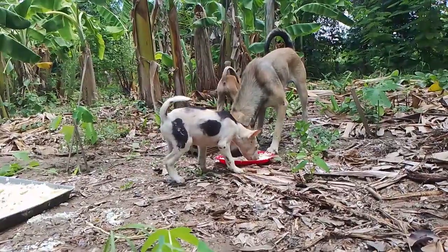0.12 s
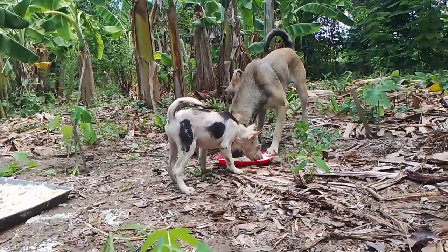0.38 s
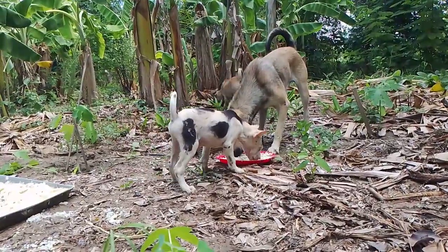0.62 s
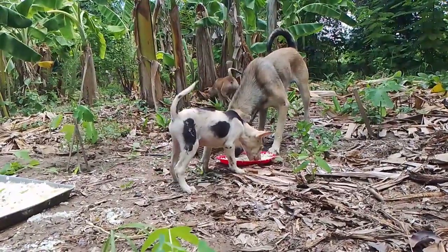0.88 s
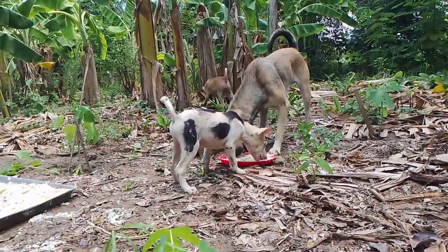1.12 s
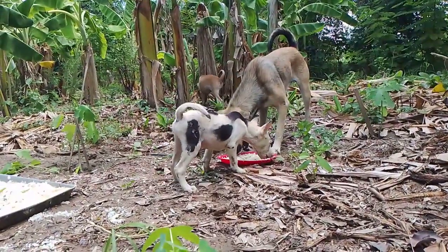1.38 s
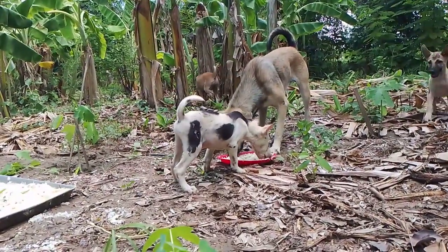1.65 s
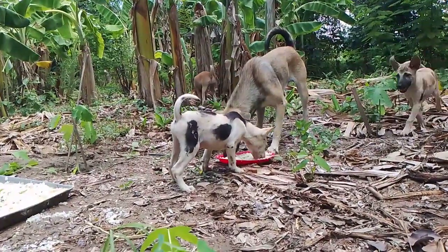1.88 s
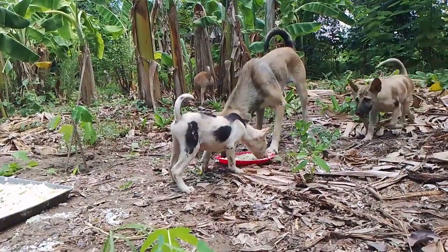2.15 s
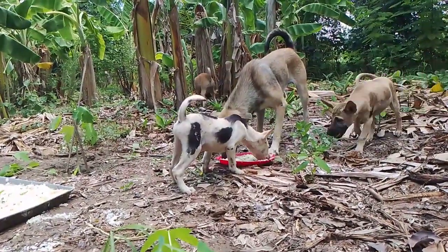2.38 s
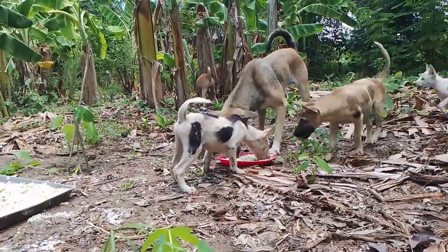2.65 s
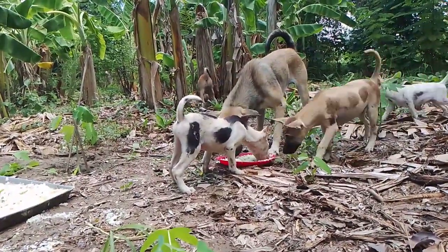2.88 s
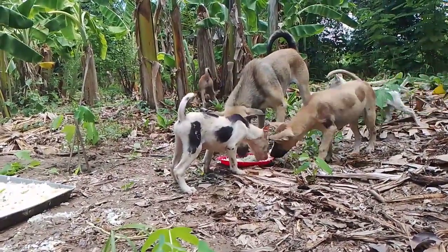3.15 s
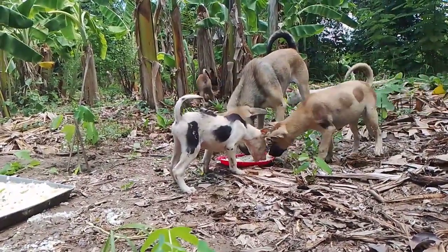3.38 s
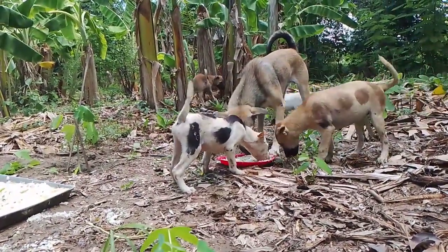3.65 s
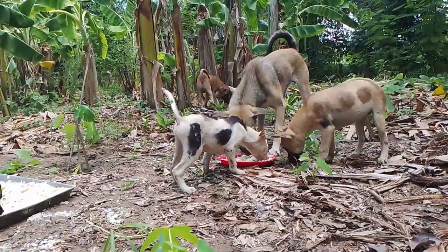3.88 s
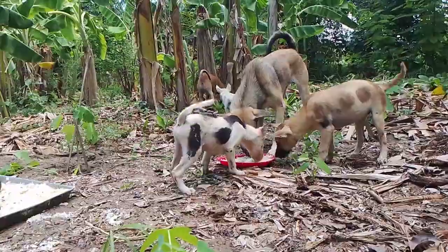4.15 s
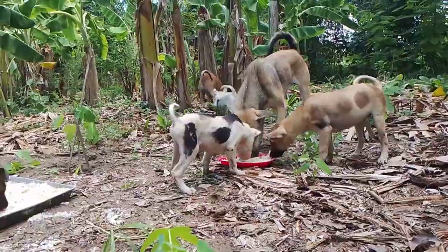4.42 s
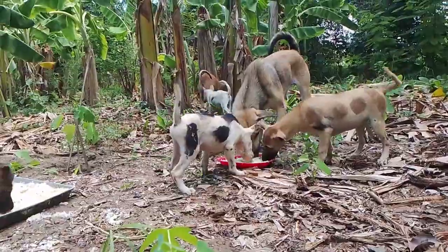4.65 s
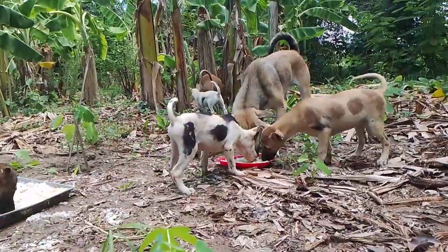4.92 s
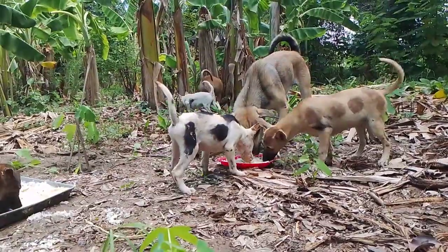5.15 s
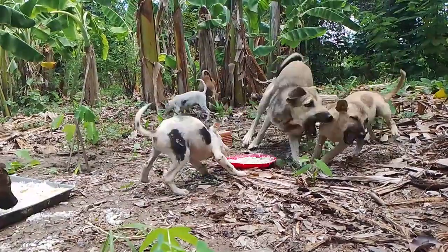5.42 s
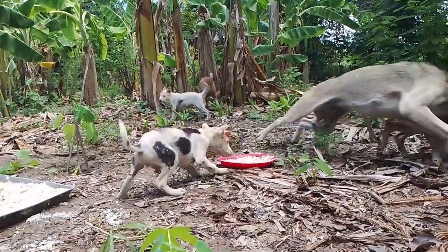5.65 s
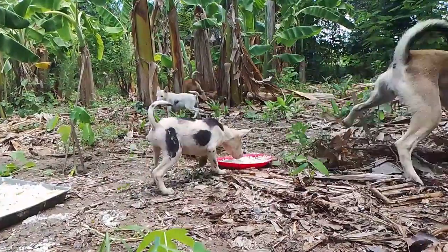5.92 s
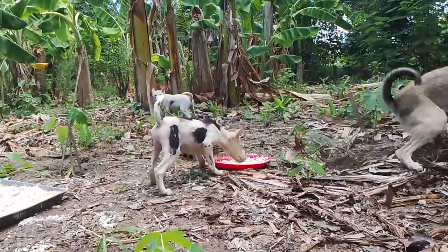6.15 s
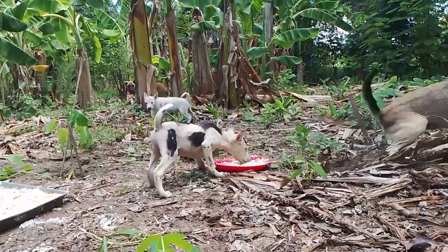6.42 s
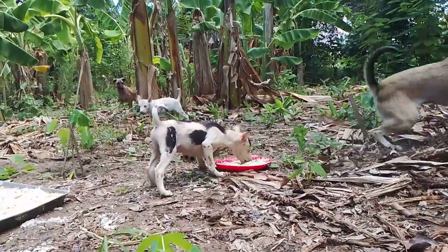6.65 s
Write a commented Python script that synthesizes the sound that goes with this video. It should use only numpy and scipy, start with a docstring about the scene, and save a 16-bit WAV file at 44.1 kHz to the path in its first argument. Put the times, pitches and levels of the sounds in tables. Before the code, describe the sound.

In a leafy grove, soft paw rustles, small twig snaps and light plastic plate ticks sit over faint steady air. A quiet low growl comes midway, then near silence. Abruptly a big dog snaps and snarls with a thud and thrashing leaves, and a puppy screams three times, hoarse, piercing and squeaky. One fixed microphone a few metres away; trunks return a slight echo.

```python
"""Paws rustle in dry leaves in a grove, twigs snap and a plastic plate ticks as dogs feed; a big dog growls low.
Then it snaps and snarls, and a pup screams three times, hoarse with a few clear squeaks; the trunks throw it back.
Voices are vocal pulses and leaking air sent through the resonances of a throat; leaves are shaped noise and
short cracks; the plate is a set of fading tones. Low thuds, faint whistles and steady air fill in the rest."""
import sys
import numpy as np
from scipy import signal
from scipy.io import wavfile
from scipy.ndimage import uniform_filter1d, minimum_filter1d

SR = 44100
rng = np.random.default_rng(int(sys.argv[2]) if len(sys.argv) > 2 else 0)


def voltage_ratio(decibels):
    """Convert decibels (scalar or array-like) to amplitude ratios, 20 dB per decade."""
    exponent = np.asarray(decibels, float) / 20
    return 10 ** exponent


def to_wav(s):
    """Save 16-bit WAV."""
    ch = np.atleast_2d(s).T  # columns
    pcm = np.round(np.clip(ch, -1, 1) * 32767)  # PCM
    wavfile.write(sys.argv[1], SR, pcm.astype(np.int16))


N = 299439

# ringing modes of the plate: [pitch_hz, level_db, t60_s (time to fade 60 dB)]
PLATE_MODES = [(398, 0.5, 0.1), (730, 6.5, 0.052), (1430, 5.5, 0.07), (2440, -5, 0.12), (2730, -4, 0.047),
               (3920, 0, 0.087)]


def evened(x):
    """Scales to an average power of 1."""
    return x / np.sqrt(np.mean(x ** 2) + 1e-20)


def drift(shape, size):
    """Slow random wandering: noise smoothed over this many samples."""
    return evened(uniform_filter1d(rng.standard_normal(shape), size))


def columns(rows, t):
    """Reads every column of a table at the times t."""
    s, *values = np.transpose(rows)
    return [np.interp(t, s, v) for v in values]


def span(rows):
    """Sample times from the first to the last row."""
    first, last = round(rows[0][0] * SR), round(rows[-1][0] * SR)
    return np.arange(first, min(last, N)) / SR


def add(mix, s, sound):
    """Mixes a sound in at time s."""
    part = mix[round(s * SR):][:len(sound)]
    part += sound[:len(part)]


def resonate(x, hz, width_hz):
    """A steep moving resonance: shift down, smooth twice, shift back."""
    turn = np.exp(2j * np.pi * np.cumsum(hz * np.ones(len(x))) / SR)
    r = np.exp(-np.pi * width_hz / SR)
    smooth = signal.lfilter([(1 - r) ** 2], [1, -2 * r, r ** 2], x / turn + 1e-18)
    return 2 * (turn * smooth).real


def steady(x, size=900):
    """Evens out the slow level so that another curve can set it."""
    return x / np.sqrt(uniform_filter1d(x ** 2, size) + 1e-12)


def folds(hz, rough, jitter, top_hz):
    """Vocal pulses: rough folds wander in rate, vary in strength each cycle and leak puffs of air."""
    air, strength = rng.standard_normal((2, len(hz)))
    turns = np.cumsum(hz * (1 + jitter * rough * drift(len(hz), 600))) / SR
    # the k-squared phase smears each pulse over part of its cycle
    pulses = sum(np.cos(2 * np.pi * k * turns + .11 * k * k) * (k * hz < top_hz)
                 for k in range(1, int(top_hz / hz.min())))
    pulses = steady(pulses) * voltage_ratio(4 * rough * uniform_filter1d(strength[turns.astype(int)], 30))
    # air leaks most at the start of each cycle
    puffs = evened((.5 + np.exp(-(turns % 1) / 0.33)) * air) * np.sqrt(SR / 2 / top_hz)
    return np.sqrt(1 - rough ** 2) * pulses + .62 * rough ** 2.4 * puffs


def noise(spectrum, shape_db, patchy_db, size):
    """Random short-time spectra; shape_db(hz, t) moves them, patches drift over them."""
    hz = np.fft.rfftfreq(size, 1 / SR)[:, None]
    t = np.arange(4 * N // size + 5) * size / 4 / SR
    a, b, patches = rng.standard_normal((len(t), len(hz), 3)).T
    patches = evened(uniform_filter1d(uniform_filter1d(patches, 6, 0), 14, 1))
    f, level_db = np.transpose(spectrum)
    colour_db = np.interp(np.log(hz + 1), np.log(f + 1), level_db)
    z = (a + 1j * b) * voltage_ratio(colour_db + patchy_db * patches)
    # the loudness is evened before shape_db acts, so shape_db sets the level
    scale = np.std(signal.istft(z, nperseg=size, noverlap=3 * size // 4)[1])
    shaped = signal.istft(z * voltage_ratio(shape_db(hz, t)), nperseg=size, noverlap=3 * size // 4)[1]
    return shaped[:N] / scale


def air():
    """The steady background: noise with a fixed colour and slow drifting patches."""
    # colour of the air: [pitch_hz, relative_level_db]
    air_colour = [(26, -41), (45, 1), (92, -7.5), (135, -6), (165, -9), (205, -3), (290, 1), (474, -5),
                  (989, -5.5), (2120, -0.5), (3630, -8.5), (7760, -24), (8990, -18.5), (13000, -87),
                  (15800, -32)]
    return voltage_ratio(-56) * noise(air_colour, lambda hz, t: 0 * t, patchy_db=2.0, size=2048)


def thuds():
    """Bodies push on the ground: short low tones that die fast."""
    # [start_s, level_db]
    pushes = [(5.367, -26), (5.947, -39), (6.55, -44)]
    out, t = np.zeros(N), np.arange(9000) / SR
    for s, level_db in pushes:
        tone = np.sin(2 * np.pi * 55 * t) * np.minimum(t / 0.0024, 1)
        add(out, s - .004, voltage_ratio(level_db - 60 * t / 0.042) * tone)
    return out


def whistles():
    """Faint pure tones whose level wavers and sinks by 7 dB."""
    # [start_s, end_s, pitch_hz, level_db]
    tones = [(4.162, 4.2, 2730, -46), (4.17, 4.457, 2240, -53.5), (4.45, 4.955, 480, -62),
             (5.07, 5.128, 2840, -54.5)]
    out = np.zeros(N)
    for s, end, hz, level_db in tones:
        t = np.arange(0, end - s, 1 / SR)
        waver_db = 2.6 * drift(len(t), 900)
        tone = np.sin(2 * np.pi * hz * t) * signal.windows.tukey(len(t), .15)
        add(out, s, voltage_ratio(level_db - 7 * t / (end - s) + waver_db) * tone)
    return out


def paws(t):
    """Level and crispness of the rustle: every step swells and fades, their powers add."""
    # paws in the leaves: [loudest_s, level_db, fade_s (time to fade 10 dB), treble_db]
    steps = [(.02, -53, 0.93, -3), (.55, -51.5, 0.6, -4), (.853, -46.5, 0.26, -6.5),
             (.935, -52.5, 0.48, 15), (1.105, -37.5, -0.6, -7), (1.207, -44.5, 0.33, -3.5),
             (1.282, -45.5, 0.11, 12), (1.335, -47, 0.1, 0), (1.416, -43.5, 0.03, -2.5),
             (1.537, -43.5, 0.22, 2), (1.711, -52.5, 0.3, -3), (1.884, -46, 0.24, -2.5),
             (1.967, -35.5, 0.03, 3.5), (2.05, -48.5, 0.08, 3), (2.256, -48, 0.36, 0.5),
             (2.577, -44.5, 0.16, 4.5), (2.679, -43.5, 0.01, -1), (2.774, -49, 0.28, 4.5),
             (3.114, -51.5, 0.25, 0.5), (3.267, -45, 0, -3), (3.492, -51, 0.36, -1.5),
             (3.582, -52.5, 0.05, -16), (3.8, -53, 0.33, -1.5), (4.268, -58, 0.23, 10.5),
             (5.04, -61, 4.2, -30), (5.389, -22, 0.066, -13.5), (5.5, -26.5, 0.31, -3),
             (5.68, -25, 0.1, -2), (5.87, -28, 0.1556, -2), (5.959, -34, 0.18, -11), (6.05, -31, 0.21, 0),
             (6.378, -31.5, 0.23, 0), (6.78, -35.5, 0.5, -3)]
    rise_share, bed_db = 0.28, -68  # the swell as a share of the fading time; a faint bed of rustle
    s, level_db, fade_s, treble_db = np.transpose(steps)[:, :, None]
    late = (t - s) / np.maximum(fade_s, .004)
    power = voltage_ratio(2 * (level_db - 10 * np.maximum(late, -late / rise_share)))
    total = power.sum(0) + voltage_ratio(2 * bed_db)
    return 10 * np.log10(total), (power * treble_db).sum(0) / total


def ground():
    """A dull rumble that follows the steps, weakened under all but the heavy ones."""
    heavy_db = -40  # below this the rumble falls twice as fast as the rustle
    t = np.arange(0, N / SR, .01)
    level_db = paws(t)[0]
    level_db = np.interp(np.arange(N) / SR, t, level_db + np.minimum(level_db - heavy_db, 0))
    rumble = resonate(rng.standard_normal(N), hz=222, width_hz=127)
    return voltage_ratio(level_db - 19) * evened(rumble)


def leaves():
    """Rustle swells under each step, with short pitched cracks of single leaves scattered through it."""
    # colour of the rustle: [pitch_hz, relative_level_db]
    leaf_colour = [(170, -41), (330, -1.5), (700, -8), (1000, -10), (1440, -7.5), (2500, -4.5), (4000, -8),
                   (7000, -17.5), (10000, -20.5), (13000, -34), (15800, -27)]

    def shape_db(hz, t):
        """Follows the steps; their treble comes in from 3500 Hz and is full an octave higher."""
        level_db, treble_db = paws(t)
        return level_db + np.clip(np.log2(hz / 3500 + 1e-9), 0, 1) * treble_db

    # about 300 tiny grains a second make the rustle uneven
    crackle = voltage_ratio(2.2 * np.minimum(rng.exponential(1, N), 4)) * (rng.random(N) < 300 / SR)
    grain = signal.oaconvolve(crackle, np.exp(-np.arange(1500) / SR / .003))[:N]
    rustle = noise(leaf_colour, shape_db, patchy_db=2.8, size=256) * evened(2.4 + grain)

    cracks = np.zeros(N)
    f, colour_db = np.transpose(leaf_colour)
    for hz in np.geomspace(350, 11000, 16):
        u = np.arange(0, 5 / hz + .002, 1 / SR)
        # about 14 cracks a second at each pitch
        train = voltage_ratio(4 * np.minimum(rng.exponential(1, N), 3)) * (rng.random(N) < 14 / SR)
        crack = np.sin(2 * np.pi * hz * u) * np.hanning(len(u))
        crack *= voltage_ratio(np.interp(hz, f, colour_db)) * np.sqrt(hz / f[1])
        cracks += signal.oaconvolve(train, crack)[:N]
    t = np.arange(0, N / SR, .005)
    level_db = np.interp(np.arange(N) / SR, t, paws(t)[0])
    return rustle + evened(cracks) * voltage_ratio(level_db - 12)


def snaps():
    """Each snap is a crack and a burst of noise round its centre that also rings the plate; most are leaves or
    twigs, and the one at 5.289 s is the sharp start of the big dog's huff."""
    # [start_s, peak_db, centre_hz, t60_s]
    breaks = [(.64, -41.5, 533, 0.044), (0.778, -37.5, 3940, 0.14), (.846, -36, 1240, 0.045),
              (1.192, -44, 2570, 0.49), (1.272, -30, 2570, 0.21), (1.696, -34, 2460, 0.14),
              (1.954, -34.5, 423, 0.054), (1.964, -25.5, 2320, 0.24), (2.447, -46, 2370, 0.132),
              (2.595, -32, 2730, 0.14), (2.652, -34, 4700, 0.036), (3.112, -35, 690, 0.031),
              (3.351, -38.5, 2880, 0.026), (3.578, -29.5, 5850, 0.0098), (4.143, -35.5, 4070, 0.014),
              (4.165, -40, 1630, 0.29), (4.259, -41, 1630, 0.23), (5.03, -45.5, 5030, 0.12),
              (5.289, -29, 796, 0.053), (5.661, -34, 6900, 0.034), (5.963, -29, 9100, 0.042),
              (6.25, -39, 9100, 0.019), (6.513, -28, 9000, 0.013), (6.577, -32.5, 8800, 0.022)]
    out, t = np.zeros(N), np.arange(9000) / SR
    ring = sum(voltage_ratio(db - 60 * t / t60) * np.sin(2 * np.pi * hz * t) for hz, db, t60 in PLATE_MODES)
    for s, peak_db, hz, t60 in breaks:
        fade = voltage_ratio(-60 * t / t60) + 0.39 * voltage_ratio(-60 * t / 0.0014)
        burst = rng.standard_normal(len(t)) * fade
        body = resonate(burst, hz, 0.92 * hz)
        crack = 0.021 * np.diff(burst, prepend=0)
        plate = 0.0079 * signal.oaconvolve(body, ring)[:len(t)]
        colour = body + crack + plate
        add(out, s - .001, voltage_ratio(peak_db) * colour / abs(colour).max())
    return out


def knocks():
    """Tongues and teeth knock the plate: each knock rings the modes nearest its pitch, briefly."""
    # [start_s, peak_db, pitch_hz (of the modes struck most)]
    hits = [(0.846, -35.5, 1500), (0.968, -39, 1420), (1.101, -41, 366), (1.166, -45.5, 323),
            (1.273, -30, 1430), (1.315, -44, 1460), (1.403, -36, 1410), (1.465, -33.5, 1110),
            (1.62, -46, 624), (2.675, -43, 834), (2.706, -43, 764)]
    out, t = np.zeros(N), np.arange(5000) / SR
    for s, peak_db, near_hz in hits:
        ring = np.zeros(len(t))
        for hz, db, t60 in PLATE_MODES:
            struck_db = db - 8.3 * np.log2(hz / near_hz) ** 2
            ring += voltage_ratio(struck_db - 60 * t / t60) * np.sin(2 * np.pi * hz * t)
        ring *= np.minimum(t / 0.0029, 1)
        add(out, s - .001, voltage_ratio(peak_db) * ring / abs(ring).max())
    return out


def growl():
    """Slow warning growls in the chest: slow vocal beats swell in, waver, rise a little and stop short."""
    # [start_s, length_s, level_db, chest_share (multiplies the chest pitches)]
    warnings = [(3.171, 0.73, -50.5, 1), (3.928, 0.088, -51.5, 1), (4.014, 0.049, -50.5, 1),
                (6.665, 0.218, -44, 0.88)]
    # chest resonances: [pitch_hz, width_hz, level_db]
    chest_modes = [(112, 78, 3.5), (314, 82, 10.5), (695, 130, -1.5)]
    swell_share, stop_s = 0.3, 0.025  # the swell is a share of the length
    high_pass = signal.butter(3, 70, "high", fs=SR, output="sos")
    out = np.zeros(N)
    for start, length, level_db, share in warnings:
        t = np.arange(0, length, 1 / SR)
        drive = folds(49.5 + 0 * t, rough=.47, jitter=.2, top_hz=1000)
        chest = sum(voltage_ratio(db) * resonate(drive, f * share, w) for f, w, db in chest_modes)
        chest = signal.sosfilt(high_pass, chest)  # too small for its own lowest note
        waver_db = 2 * drift(len(t), 800)
        end_rise_db = 2.5 * (t / length) ** 4
        shape = np.minimum(t / (swell_share * length), 1) * np.minimum((length - t) / stop_s, 1)
        add(out, start, voltage_ratio(level_db + waver_db + end_rise_db) * steady(chest, size=4000) * shape)
    return out


def big_dog():
    """The big dog's huff, snap and snarls: each swells, holds and dies while the throat pitch sags."""
    # [start_s, length_s, effort_db, first_throat_hz, loudest_share (0-1 of the length)]
    snarls = [(5.284, 0.051, -35.5, 1160, 0.7), (5.345, 0.082, -7.5, 740, 0.17),
              (5.42, 0.046, -14.5, 545, 0.5), (5.503, 0.11, -14.5, 896, 0.98), (5.629, 0.11, -24, 700, 0.4),
              (5.737, 0.039, -18.5, 660, 0.03), (5.833, 0.19, -20.5, 550, 0.05),
              (6.425, 0.15, -25.5, 850, 0.43)]
    # vocal folds: [time_s, beat_rate_hz, irregularity (0 clear - 1 chaos)]
    snarl_folds = [(5.28, 120, .85), (5.343, 345, .62), (5.38, 330, .62), (5.39, 319, .35), (5.41, 312, .6),
                   (5.43, 190, .85), (5.8, 180, .85), (5.83, 185, .66), (5.98, 165, .66), (6.2, 160, .85),
                   (6.79, 150, .85)]
    # throat resonances above the first: [pitch_hz, width_hz, level_db]
    upper_throat = [(1113, 210, -10.5), (2020, 230, -14.5), (2880, 1200, -13.5)]
    edge_db, flatness = -26, 2.93  # level at both ends; a higher flatness holds the top longer
    out = np.zeros(N)
    for start, length, effort_db, first_hz, loudest in snarls:
        u = np.arange(0, length, 1 / SR) / length
        away = abs(np.interp(u, [0, np.clip(loudest, .02, .98), 1], [-1, 0, 1]))
        drive = folds(*columns(snarl_folds, start + u * length), jitter=.16, top_hz=4000)
        # the first resonance falls 6.2 % as the jaws close; the upper ones gain 3 dB
        throat = steady(resonate(drive, first_hz * (1 - 0.062 * u), 467), size=600)
        throat += sum(voltage_ratio(db + 3 * u) * steady(resonate(drive, f, w)) for f, w, db in upper_throat)
        add(out, start, voltage_ratio(effort_db + edge_db * away ** flatness) * throat)
    return out


def screams():
    """The pup's three screams: rough vocal pulses through a throat whose resonances move."""
    # one table each: [time_s, effort_db, low_hz, mid_hz, gape (0-1), strain (0-1)]
    scream_tables = [
        [(5.41, -21, 1120, 2380, 0.55, 0.4), (5.432, -15.5, 1090, 2000, 0.29, 0.56),
         (5.512, -8.5, 1040, 2500, 0.68, 0.92), (5.558, -8.5, 1580, 2310, 0.78, 0.75),
         (5.612, -11, 1486, 2360, 0.86, 0.54), (5.646, -9, 1660, 2350, 0.7, 0.52),
         (5.696, -7, 1750, 2680, 0.89, 0.58), (5.726, -18, 1620, 2400, 0.7, 0.96),
         (5.78, -11, 1480, 2180, 0.82, 0.23), (5.81, -40, 1560, 2400, 0.05, 0.14)],
        [(5.945, -7, 1170, 2300, 0.14, 0.6), (5.959, -19.5, 1210, 2570, 0.87, 0.9),
         (5.985, -11, 1550, 2440, 0.34, 0.58), (6.021, -19.5, 1430, 2000, 0.39, 0.6),
         (6.053, -8, 1190, 2140, 0.6, 0.42), (6.097, -8, 1120, 2460, 0.92, 0.2),
         (6.135, -14, 1170, 2130, 0.91, 0.64), (6.193, -13.5, 1239, 2440, 0.72, 0.81),
         (6.217, -17.5, 1250, 2310, 1, 0.68), (6.247, -7, 1420, 2300, 0.95, 0), (6.272, -31, 1410, 2500, 1, 0)],
        [(6.425, -10, 1600, 2580, 0.1, 0.6), (6.481, -11, 1410, 2350, 0.7, 0.33),
         (6.503, -12.5, 1530, 2555, 0.79, 0.55), (6.563, -16, 1410, 2170, 0.54, 0.48),
         (6.601, -7, 1500, 2440, 0.71, 0.43), (6.647, -14.5, 1620, 2500, 0.9, 0.5),
         (6.695, -14, 1490, 2420, 0.85, 0.2), (6.74, -34, 1730, 2440, 1, 0.14)],
    ]
    # vocal folds: [time_s, beat_rate_hz, irregularity (0 clear - 1 chaos)]
    pup_folds = [(5.41, 275, .8), (5.45, 262, .6), (5.465, 265, .26), (5.505, 277, .36), (5.53, 276, .62),
                 (5.55, 280, .66), (5.65, 280, .74), (5.74, 292, .55), (5.8, 290, .6), (5.945, 340, .48),
                 (5.995, 291, .42), (6.03, 284, .27), (6.055, 290, .25), (6.078, 312, .7), (6.2, 310, .68),
                 (6.28, 345, .65), (6.43, 303, .5), (6.46, 295, .5), (6.48, 350, .62), (6.55, 325, .66),
                 (6.6, 350, .7), (6.74, 352, .65)]
    # the sharp ring holds or glides, then jumps: [start_s, pitch_hz, glide_hz_per_s]
    ring_rows = np.array([(5.41, 2278, 3002), (5.513, 2770, -1000), (5.553, 2330, -1200),
                          (5.661, 2318, 8490.5), (5.743, 2225, 7998), (5.763, 2880, 501.5),
                          (5.779, 2300, -500), (5.946, 2170, 9000), (6.0, 2020, 1502), (6.074, 2730, -300),
                          (6.2, 2040, 500.5), (6.24, 2744, 502), (6.425, 2640, -2000), (6.47, 2680, -5500),
                          (6.529, 2590, -7000), (6.58, 2730, -300), (6.613, 2664, -9000),
                          (6.644, 2437, 3006), (6.701, 2740, -2000)])
    # the voice cracks: [time_s, level_db, width_s]
    voice_cracks = [(5.654, -13, 0.0094), (5.73, -11, 0.0069), (6.237, -12, 0.0051)]
    # the shrill resonance bends: [time_s, pitch_hz]
    shrill_rows = [(5.41, 5270), (5.63, 5100), (5.665, 6130), (5.72, 7450), (5.78, 5940), (5.945, 6160),
                   (6.09, 6100), (6.135, 7030), (6.2, 6400), (6.43, 7730), (6.57, 7480), (6.63, 6400),
                   (6.74, 6100)]
    # nose, then back of the mouth: [pitch_hz, width_hz, level_db]
    nose, back = [(910, 660, -9.5), (4640, 260, -19)]
    out = np.zeros(N)
    for rows in scream_tables:
        t = span(rows)
        effort_db, low_hz, mid_hz, gape, strain = columns(rows, t)
        effort_db = effort_db + sum(db * np.exp(-((t - s) / width) ** 2) for s, db, width in voice_cracks)
        beat_hz, rough = columns(pup_folds, t)
        drive = folds(beat_hz, rough, jitter=.065, top_hz=9000)

        flicker = drift((4, len(t)), 600)
        ragged_db = 5.5 * flicker[0]  # the shrill part comes in ragged bursts
        low_db, ring_db, top_db = 4.5 * rough * flicker[1:]  # rough folds feed each resonance unevenly
        # the narrow resonances waver in pitch, the ring about half as far
        warble = 1 + .03 * evened(uniform_filter1d(drift((2, len(t)), 400), 400))
        current = np.maximum(np.searchsorted(ring_rows[:, 0], t, "right") - 1, 0)
        s, ring_hz, glide = ring_rows[current].T
        ring_hz = (ring_hz + glide * (t - s)) * np.sqrt(warble[0])
        shrill_hz = columns(shrill_rows, t)[0]

        low = steady(resonate(drive, low_hz, 386))
        mid = 0.7 * steady(resonate(drive, mid_hz, 930))
        mid += 0.75 * voltage_ratio(1.46 * ring_db) * steady(resonate(drive, ring_hz, 105))
        top = steady(resonate(drive, 3530 * warble[1], 1050))
        shrill = steady(resonate(drive, shrill_hz, 1400))
        shrill += 0.76 * steady(resonate(drive, shrill_hz * warble[1], 160))

        # the low part and the nose weaken as the mouth gapes; the upper parts wake with strain
        throat = voltage_ratio(17 - 34.5 * gape + low_db) * low - steady(mid)
        throat += voltage_ratio(-34 + 33.5 * strain + top_db) * top
        throat -= voltage_ratio(-42.5 + 19 * strain + ragged_db) * steady(shrill)
        throat -= voltage_ratio(nose[2] - 17.5 * gape) * steady(resonate(drive, *nose[:2]))
        throat -= voltage_ratio(back[2] + ragged_db) * strain ** 2 * steady(resonate(drive, *back[:2]))
        add(out, t[0], voltage_ratio(effort_db) * steady(throat, size=500) * signal.windows.tukey(len(t), .07))
    return out


def squeaks():
    """The pup's clear squeaks: a gliding note and its overtones, each flickering on its own."""
    # one table each: [time_s, pitch_hz, level_db]
    squeak_tables = [
        [(5.918, 1880, -38), (5.928, 2095, -13), (5.94, 2098, -14), (5.948, 2100, -33)],
        [(6.17, 1198, -14.5), (6.21, 1234, -18.5), (6.24, 1340, -25.5), (6.255, 1404, -14.5), (6.28, 1385, -48),
         (6.325, 1443, -23)],
        [(6.388, 1463, -51), (6.396, 1376, -28), (6.404, 1294, -23), (6.411, 1130, -17)],
        [(6.411, 958, -43), (6.418, 923, -24.5), (6.428, 943, -15.5), (6.438, 932, -18), (6.46, 872, -37)],
        [(6.635, 1779, -26), (6.66, 1735, -17), (6.72, 1678, -26.5), (6.78, 1770, -40)],
        [(5.66, 1154, -18), (5.69, 1194, -27), (5.715, 1254, -21), (5.73, 1270, -21)],
        [(5.948, 699, -22), (5.965, 714.3, -19.5), (5.99, 768, -12.5)],
        [(6.005, 934, -44), (6.045, 947, -25), (6.07, 988, -28), (6.095, 973, -20.5), (6.122, 945, -30)],
        [(6.655, 1281, -25), (6.68, 1300, -16), (6.697, 1451, -17.5), (6.715, 1370, -30)],
    ]
    # one row per squeak: level_db of partials 1, 2, ..
    partial_levels = [(0, -6, -30), (0, -5, -18.5), (0, 2), (0, 8, 12, 0), (0, -30), (-25, 0, -5, -17),
                      (-20, -3, 0, 0), (-10, 0, 0, 0, -11, -16), (-20, 0, -18)]
    out = np.zeros(N)
    for rows, levels in zip(squeak_tables, partial_levels):
        t = span(rows)
        hz, level_db = columns(rows, t)
        wobble = .018 * drift(len(t), 250)
        flicker_db = 5 * drift((len(levels), len(t)), 350)
        angle = 2 * np.pi * np.cumsum(hz * (1 + wobble)) / SR
        tone = sum(voltage_ratio(db + flicker_db[k]) * np.sin((k + 1) * angle) for k, db in enumerate(levels))
        add(out, t[0], voltage_ratio(level_db) * tone * signal.windows.tukey(len(t), .15))
    return out


def grove(x):
    """Sparse echoes from ground and trunks, duller as they die."""
    taps = np.zeros(SR // 2)
    at = np.arange(300, len(taps) - 20, 20)
    taps[at + rng.integers(0, 20, len(at))] = rng.choice([-1., 1.], len(at))
    hz, t, z = signal.stft(taps, SR, nperseg=256)
    t60_s = 0.41 / (1 + hz[:, None] / 6000)
    tail = signal.istft(z * voltage_ratio(-60 * t / t60_s), SR, nperseg=256)[1]
    return signal.oaconvolve(x, tail / np.linalg.norm(tail))[:N]


def scene():
    """All sources at one microphone; open mouths, leaves and plate send out little bass."""
    dogs = screams() + squeaks() + big_dog()
    near = dogs + voltage_ratio(-12) * grove(dogs) + leaves() + snaps() + knocks()
    near = signal.sosfilt(signal.butter(3, 360, "high", fs=SR, output="sos"), near)
    return (near + growl() + ground() + thuds() + whistles() + air())[None]


def top_cut(x):
    """Nothing passes above the cut-off."""
    return signal.sosfilt(signal.butter(12, 17020, fs=SR, output="sos"), x)


def record(dry):
    """The microphone drops the deepest bass and has a low notch; a fast limiter holds down the peaks."""
    notch_hz, notch_width_hz, edge_hz, ceiling = 166, 40.4, 15800, .64  # edge: top of the recorder's band
    heard = signal.sosfilt(signal.butter(3, 50, "high", fs=SR, output="sos"), dry)
    heard = signal.lfilter(*signal.iirnotch(notch_hz, notch_hz / notch_width_hz, SR), heard)
    low_pass = signal.firwin(401, edge_hz, window=("kaiser", 8), fs=SR)
    heard = signal.oaconvolve(heard, low_pass[None], "same")
    gain = minimum_filter1d(np.minimum(1, ceiling / (abs(heard) + 1e-9)), size=400)
    mix = heard * uniform_filter1d(gain, size=400)
    return top_cut(mix)


dry = scene()
out = record(dry)
to_wav(out)
```